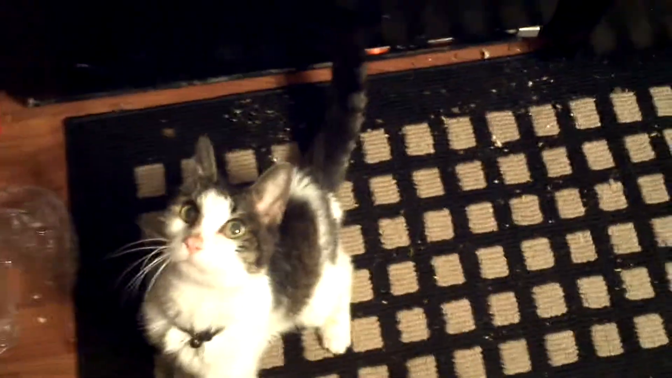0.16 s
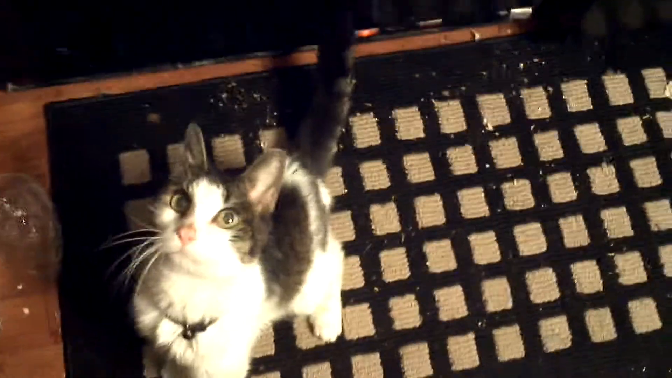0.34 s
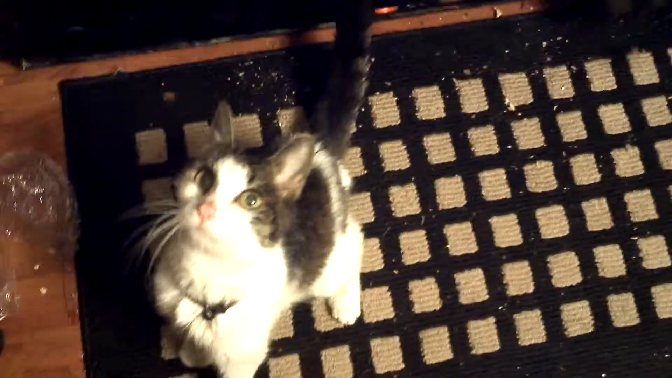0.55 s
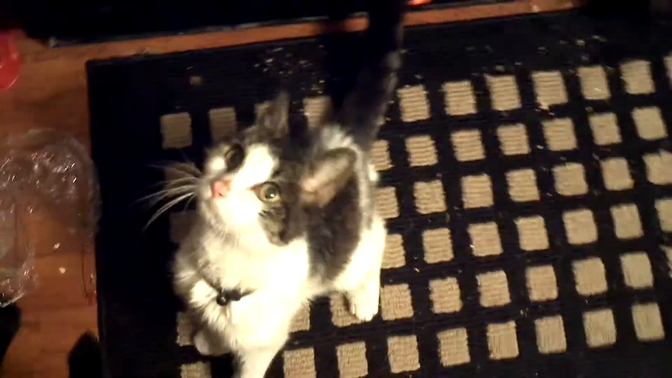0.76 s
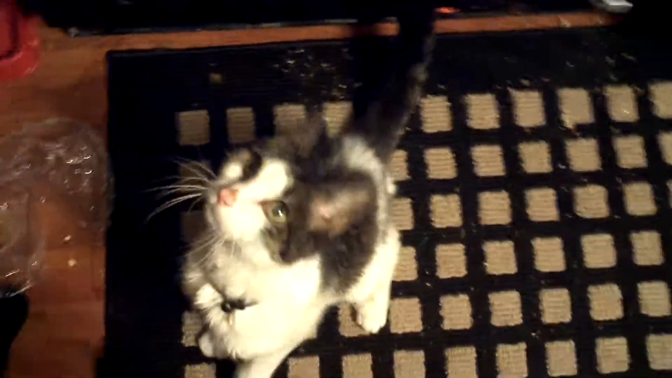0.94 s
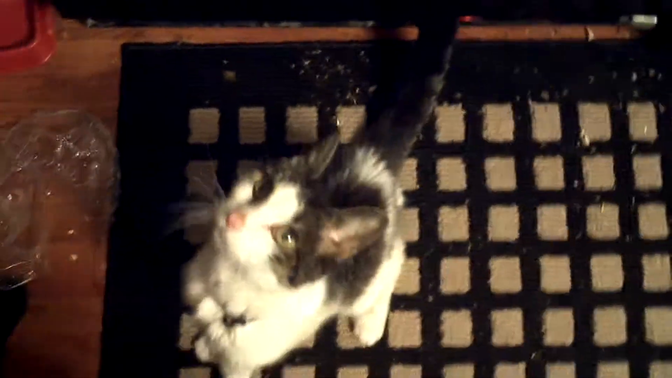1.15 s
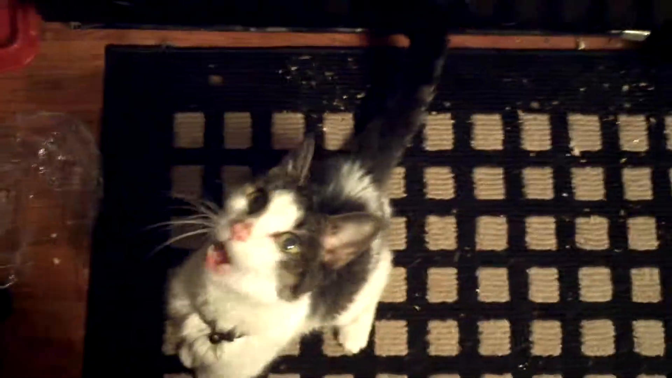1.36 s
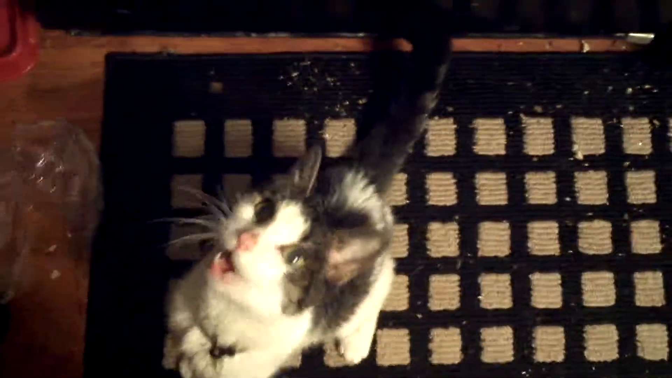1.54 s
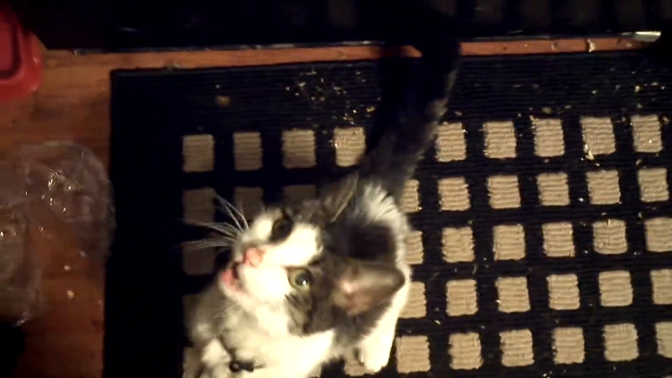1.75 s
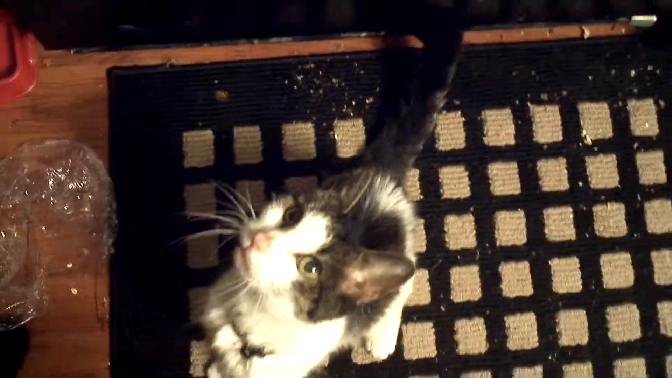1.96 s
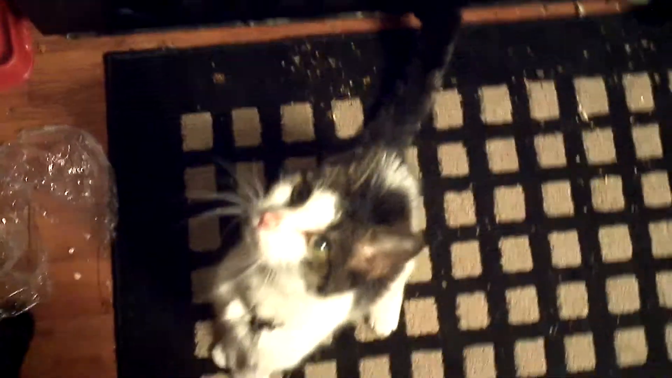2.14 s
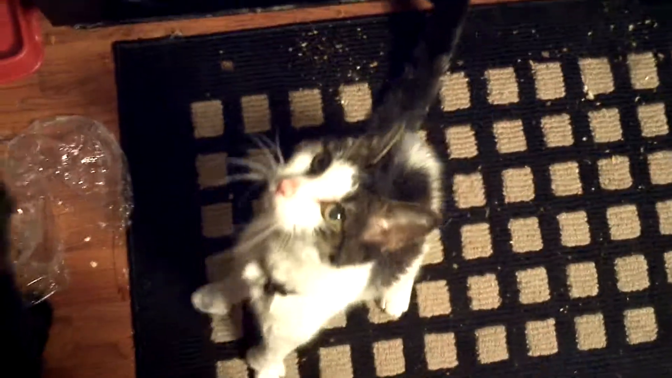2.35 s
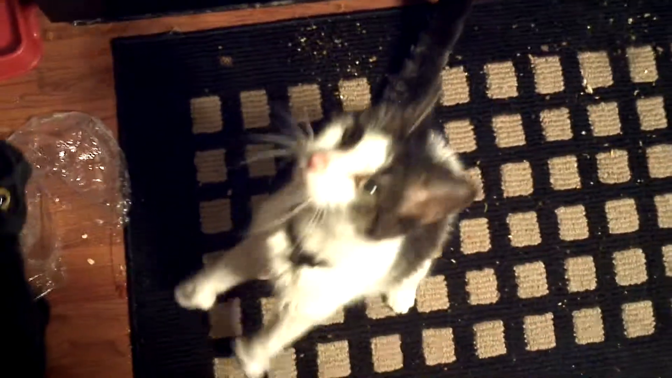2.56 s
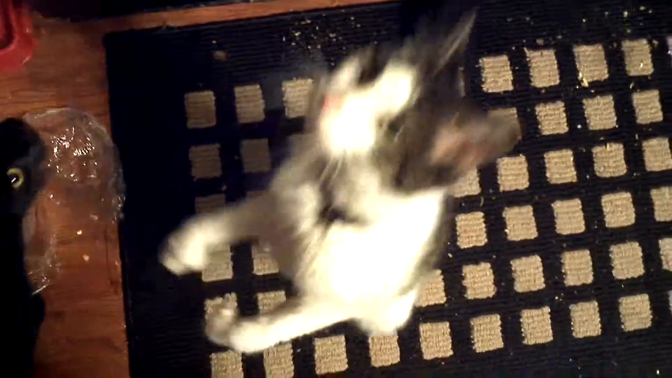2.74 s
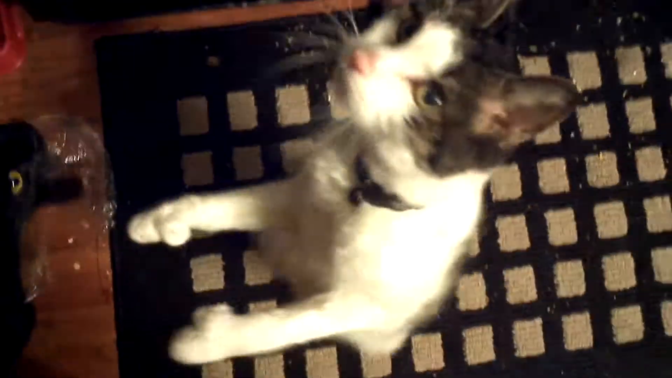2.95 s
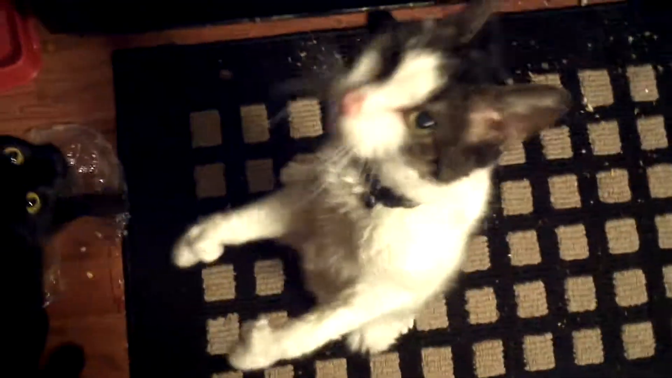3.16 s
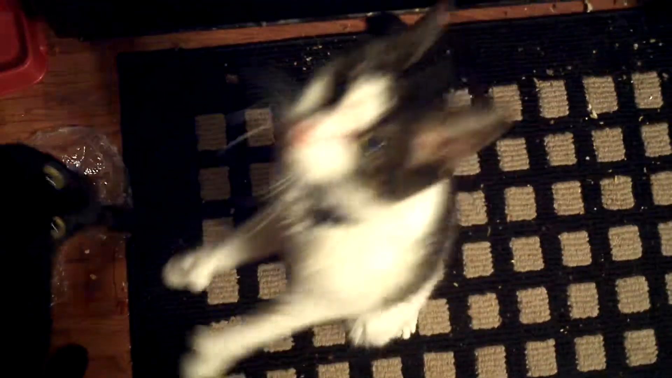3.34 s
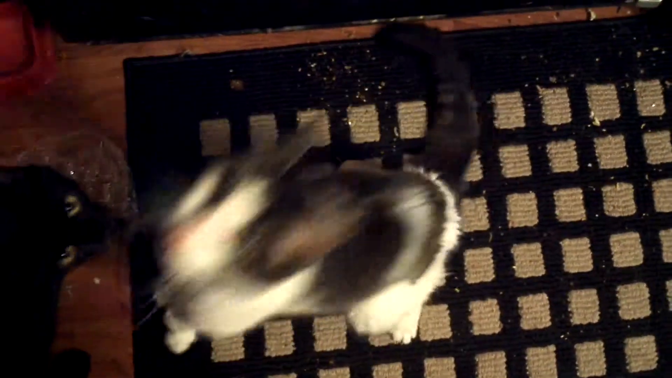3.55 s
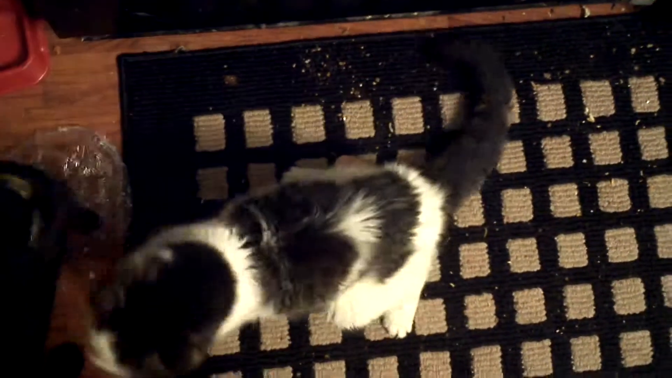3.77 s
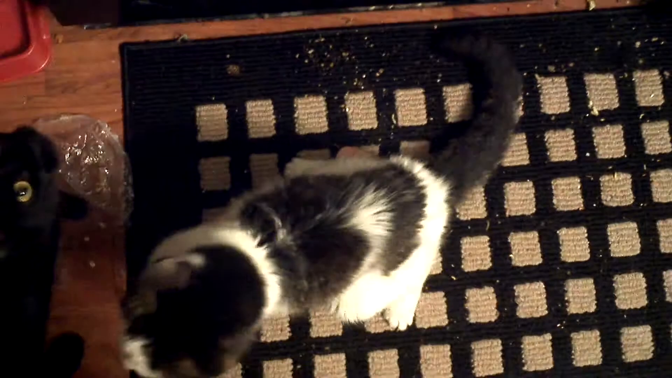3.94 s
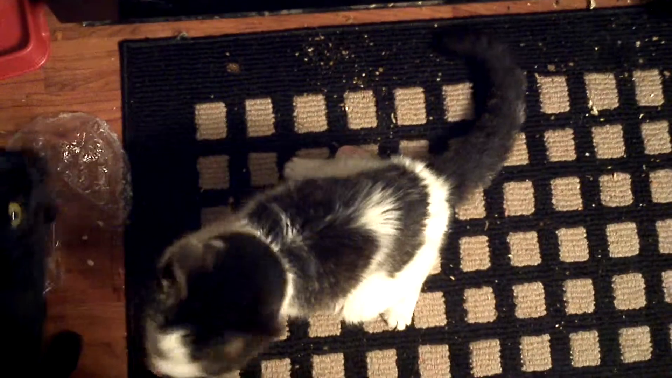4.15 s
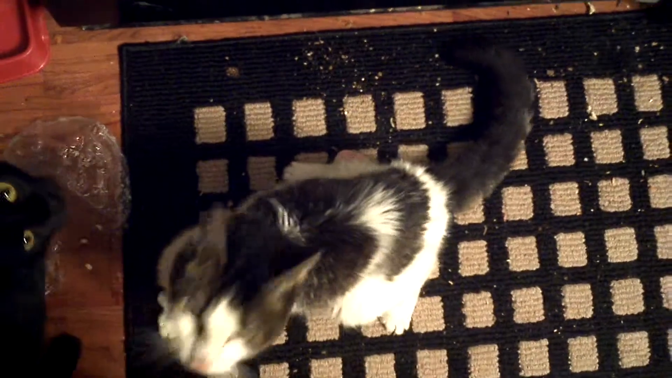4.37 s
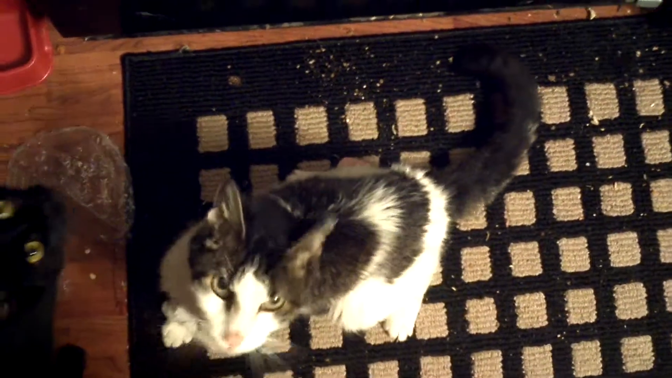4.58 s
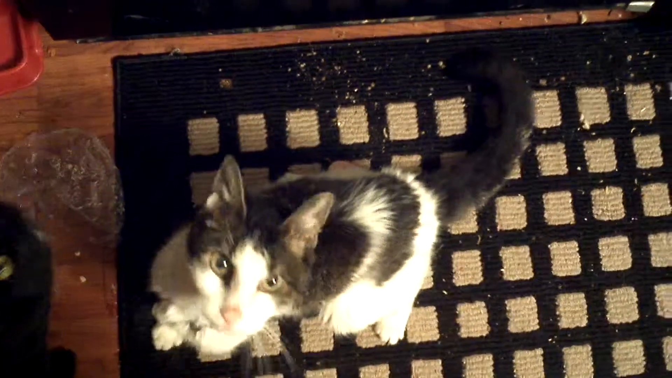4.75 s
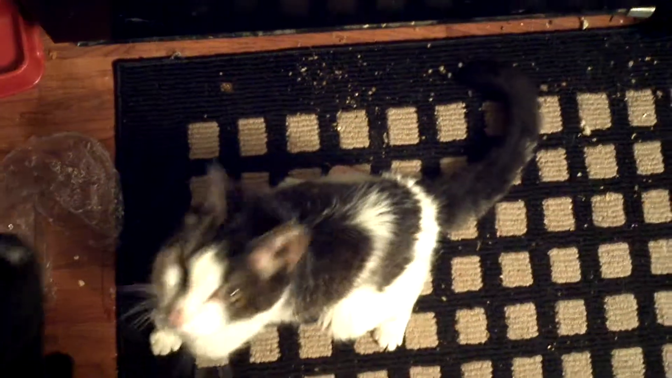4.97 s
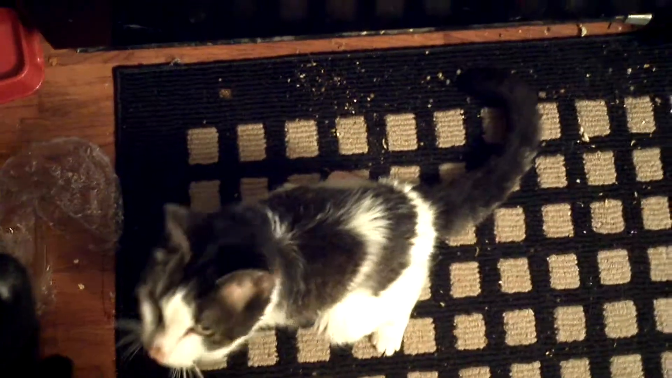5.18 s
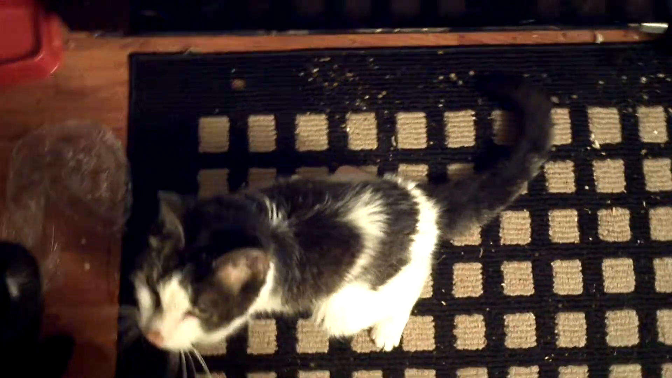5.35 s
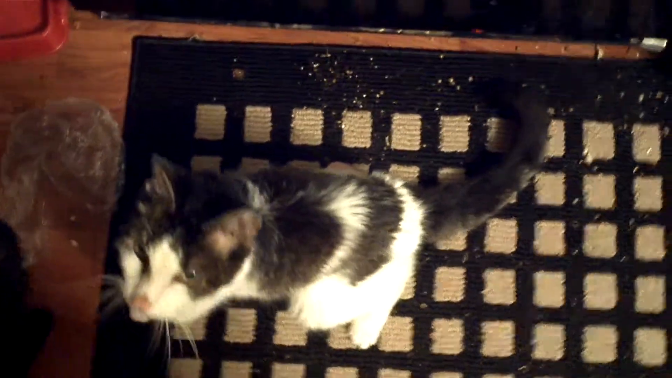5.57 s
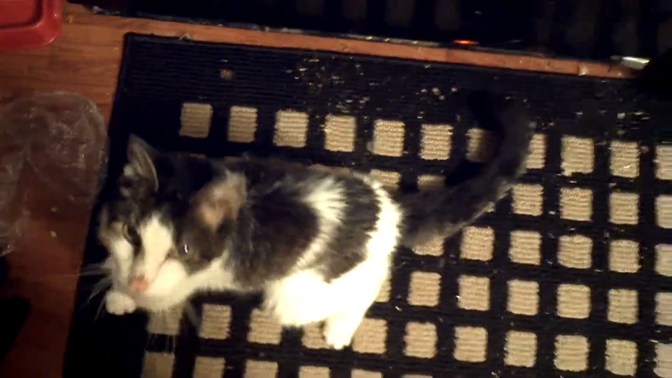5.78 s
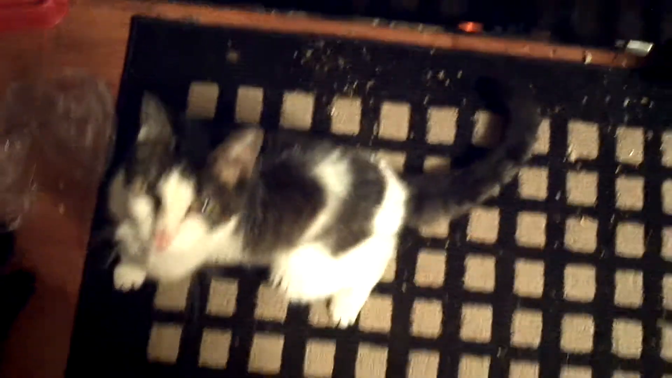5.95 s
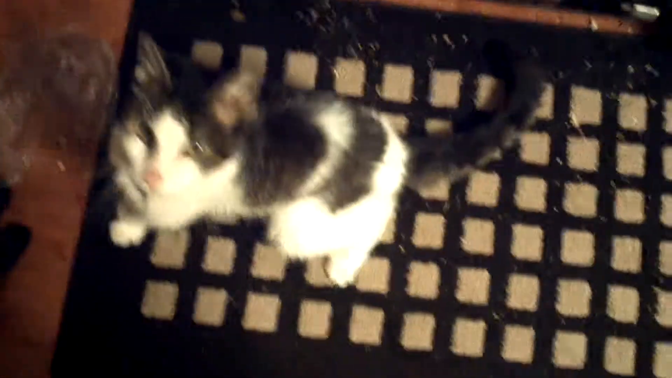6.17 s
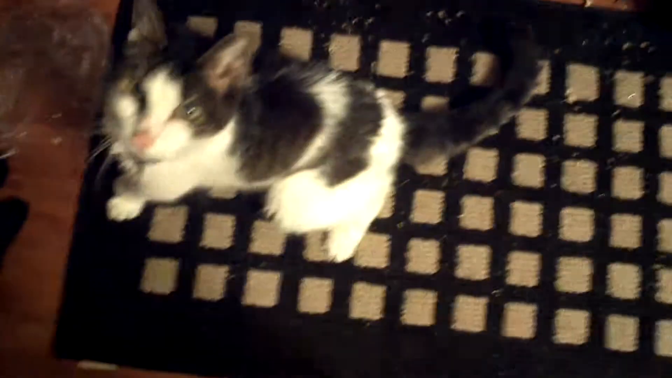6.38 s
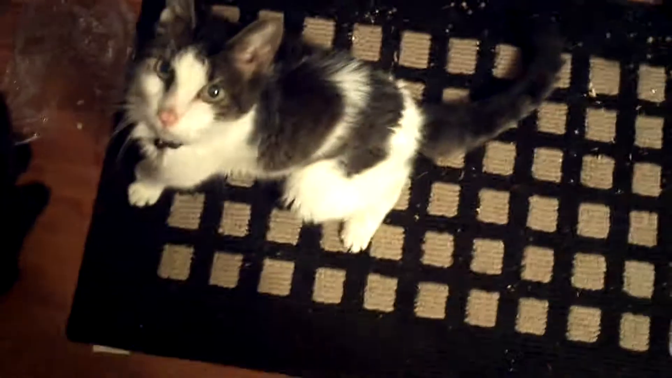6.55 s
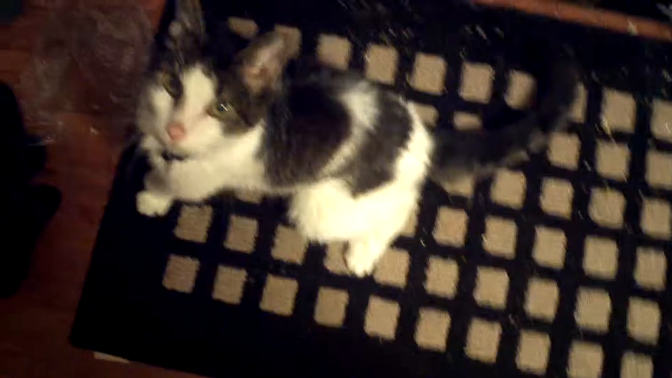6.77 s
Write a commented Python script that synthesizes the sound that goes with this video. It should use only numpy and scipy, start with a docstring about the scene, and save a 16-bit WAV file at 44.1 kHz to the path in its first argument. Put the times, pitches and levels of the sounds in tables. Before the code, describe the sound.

Indoors, a faint appliance hum runs under soft room noise and hiss. A young cat stirs on a floor mat, then meows once, close by, its pitch rising slightly and falling as the call turns raspy. A soft paw bump follows a second later. After a lull the cat shifts about with light scuffs, ticks and a few small hollow knocks, all picked up by a nearby hand-held microphone.

```python
"""An appliance hums throughout, over room noise, hiss and a thin whine that comes and goes.
A young cat stirs on a floor mat with small ticks and rustles. At 1.3 s it meows once, close by:
vocal-fold pulses ring its mouth and throat in a clear arch of pitch that breaks into a rasp at 1.7 s.
A soft paw bump comes at 3 s; from 5.5 s the cat shifts about, with scuffs, knocks and ticks.
A hand-held camera makes the stereo from two ports, each minus the delayed sound of the other."""
import sys
import numpy as np
from scipy import signal
from scipy.fft import rfft, irfft
from scipy.io import wavfile
from scipy.ndimage import uniform_filter1d

SR = 44100
rng = np.random.default_rng(int(sys.argv[2]) if len(sys.argv) > 2 else 0)


def generate_wav(sig):
    """Save sig (samples, or channels by samples) to the path in sys.argv[1] as 16-bit PCM at SR."""
    pcm = np.round(np.clip(np.atleast_2d(sig).T, -1, 1) * 32767).astype(np.int16)
    wavfile.write(sys.argv[1], SR, pcm)


N = 300497
TIME_S, BINS_HZ = np.arange(N) / SR, np.fft.rfftfreq(N, 1 / SR)
CONTACT_S = np.arange(4096) / SR  # time axis of one tick, thud or knock
PORT_LAG_S = 15 / SR


# vocal effort: t/s, level/dB
EFFORT = [(1.2, -70), (1.3, -46.5), (1.35, -38.5), (1.47, -36), (1.53, -32.5), (1.62, -30.5), (1.715, -33),
          (1.74, -34.5), (1.911, -36.5), (1.945, -46.5), (1.995, -69)]
# second resonance as the mouth opens fast and shuts slowly: t/s, f/Hz
MOUTH = [(1.22, 1110), (1.31, 1230), (1.335, 1560), (1.39, 1600), (1.45, 1570), (1.52, 1500), (1.58, 1500),
         (1.62, 1680), (1.67, 1510), (1.84, 1429), (1.95, 1150)]

def meow(body_db=-1.66, chest_db=-16.5, dip_db=-4):
    """Fold pulses and breath sound through mouth, chest and throat; the level drops in each pitch dip."""
    t = np.arange(EFFORT[0][0], EFFORT[-1][0], 1 / SR)
    cycles, pulses, puffs, roughness, dip = vocal_folds(t)
    mouth_hz = follow(MOUTH, t)
    body = mouth(pulses + .35 * roughness * puffs, mouth_hz)
    bright = throat(t, pulses + (.17 + .5 * roughness) * puffs, mouth_hz)
    body += gain(chest_db) * chest(cycles)
    voice = gain(follow(EFFORT, t) + body_db) * body + bright
    out = np.zeros(N)
    add(out, t[0], voice * gain(dip_db * dip) * signal.windows.tukey(len(t), .05))
    return near_reflection(out)


# pitch arch: t/s, f/Hz
PITCH = [(1.3, 276), (1.35, 287), (1.41, 291), (1.45, 288.5), (1.52, 294), (1.61, 297), (1.69, 291.5),
         (1.745, 290.5), (1.812, 285), (1.88, 270), (1.95, 245)]

def vocal_folds(t, clear_s=1.31, break_s=1.714, flutter_hz=29.5, wobble=.0028, jitter=.032):
    """The folds start hoarse, clear, then rasp: the pitch dips ever deeper and air gets through."""
    n = len(t)
    broken_s = np.maximum(t - break_s, 0)
    hoarse = .7 * np.exp(-np.maximum(t - clear_s, 0) / .055)
    rasp = .55 * (1 - np.exp(-broken_s / .05))
    roughness = .08 + hoarse + rasp
    flutter_rad = 2 * np.pi * flutter_hz * broken_s
    dip = np.sin((flutter_rad + .5 * (1 - np.cos(flutter_rad))) / 2) ** 4  # fast fall, slower recovery
    dip_depth = .035 + .62 * broken_s
    pitch_hz = follow(PITCH, t) * (1 - dip * dip_depth)
    pitch_hz *= 1 + wobble * drift(25, n) + jitter * roughness * drift(220, n)
    cycles = np.cumsum(pitch_hz) / SR
    pulses = unit_rms(sum(np.cos(2 * np.pi * k * cycles) for k in range(1, 52)))
    pulses *= np.exp(.4 * roughness * drift(200, n))
    airflow = .2 + np.exp(-(cycles % 1) / .2)
    puffs = unit_rms(airflow * rng.standard_normal(n))
    return cycles, pulses, puffs, roughness, dip


def mouth(drive, second_hz, first_open_hz=905):
    """Two strong resonances move with the opening; so small a mouth radiates almost no bass."""
    opening = second_hz / second_hz.max()
    first = resonate(drive, first_open_hz * np.sqrt(opening), width_hz=335)
    second = resonate(drive, second_hz, width_hz=350)
    return hold_level(bandpass(first - gain(.6) * second, [700, 2000], order=4))


# envelopes of the overtones near 2 kHz and of the treble: t/s, level/dB
OVERTONE_ENVELOPE = [(1.2, -72), (1.317, -60), (1.33, -46.5), (1.38, -42.5), (1.45, -41.5), (1.54, -43),
                     (1.64, -43), (1.74, -48.5), (1.88, -48), (1.98, -63)]
TREBLE_ENVELOPE = [(1.2, -78), (1.31, -63.5), (1.39, -47.5), (1.55, -45), (1.66, -49), (1.8, -53.5),
                   (1.93, -58), (1.98, -70)]
# throat resonances of the two bands: f/Hz, width/Hz, level/dB
OVERTONE_MODES = [(2214, 600, 11), (2480, 250, 7)]
TREBLE_MODES = [(3250, 390, 6.5), (4260, 750, -2.5), (4910, 720, -12), (6780, 600, 2.5), (7680, 880, -1),
                (11500, 3300, -31)]

def throat(t, drive, mouth_hz, wander=.018, closing_db=-20):
    """Upper resonances wander with tongue and jaw; a narrower mouth dulls the highest most."""
    dull_db_per_hz = closing_db * (1 - mouth_hz / mouth_hz.max()) / 2000
    shift = (mouth_hz / np.median(mouth_hz)) ** .053
    out = np.zeros(len(t))
    for envelope, modes in (OVERTONE_ENVELOPE, OVERTONE_MODES), (TREBLE_ENVELOPE, TREBLE_MODES):
        band = np.zeros(len(t))
        for hz, width_hz, db in modes:
            moving_hz = hz * shift * (1 + wander * drift(8.1, len(t)))
            band += gain(db + dull_db_per_hz * hz) * resonate_twice(drive, moving_hz, width_hz)
        out += gain(follow(envelope, t)) * hold_level(band)
    return out


def chest(cycles):
    """The two lowest harmonics leak unevenly through the chest."""
    harmonics = np.sin(2 * np.pi * cycles) + gain(-21) * np.sin(4 * np.pi * cycles)
    return harmonics * (1 + .35 * drift(45, len(cycles)))


def near_reflection(x, share=.23, mean_s=.0034, sway_s=.00011):
    """The path sways as head and camera move, so the overtones swell and dip in turn."""
    delay_s = mean_s + sway_s * drift(7)
    return x + share * np.interp(TIME_S - delay_s, TIME_S, x)


# sharp contacts: t/s, level/dB, f/Hz, decay/s, half width/octaves
TICKS = [(0.5432, -49, 9800, 0.0018, 0.36), (0.9368, -47.5, 2760, 0.0014, 0.38),
         (0.9381, -43, 8400, 0.00089, 0.16), (1.325, -46, 3000, .002, .9), (1.944, -47, 9000, .003, 0.73),
         (2.823, -51, 10100, .0016, 0.14), (5.8783, -42, 6000, 0.0013, 0.86),
         (6.0641, -44.5, 9500, 0.0022, 0.69), (6.1035, -42.5, 7140, 0.004, 0.053),
         (6.1035, -42, 10600, .0025, .4), (6.126, -46, 9000, 0.0016, 0.47),
         (6.132, -47, 7260, 0.0024, 0.076), (6.155, -51, 7400, .0016, .25),
         (6.2955, -38, 7360, 0.0007, 0.39), (6.3215, -42.5, 7500, .001, 0.18),
         (6.3425, -46, 6300, 0.00092, 0.84), (6.7398, -44, 7700, 0.0014, 0.11)]

def ticks(trim_db=1.5):
    """Each contact is a band of noise that dies in a few milliseconds."""
    out = np.zeros(N)
    for start_s, db, hz, decay_s, octaves in TICKS:
        edges_hz = np.clip([hz / 2 ** octaves, hz * 2 ** octaves], 20, .45 * SR)
        grit = rng.standard_normal(len(CONTACT_S)) * np.exp(-CONTACT_S / decay_s)
        burst = bandpass(grit, edges_hz, order=2)
        add(out, start_s, gain(db + trim_db) * burst / abs(burst).max())
    return out


# paw falls: t/s, level/dB, f/Hz, rise/s
PAW_THUDS = [(1.438, -39.5, 334, 0.002), (1.935, -40, 240, 0.004), (2.9774, -33, 275, 0.0022),
             (5.873, -39.5, 440, 0.0023)]

def paw_thuds():
    """Soft paws on the padded floor: a few low cycles that swell and die."""
    out = np.zeros(N)
    for start_s, db, hz, rise_s in PAW_THUDS:
        age = CONTACT_S / rise_s
        add(out, start_s, gain(db) * age * np.exp(1 - age) * np.sin(2 * np.pi * hz * CONTACT_S))
    return out


# strikes: t/s, level/dB
KNOCKS = [(2.9765, -58), (2.984, -62), (5.873, -56), (6.2052, -47.5), (6.2116, -47), (6.476, -58)]
# modes of the struck object: f/Hz, level/dB, t60/s
HOLLOW_MODES = [(1022, -1, 0.037), (1230, 0, 0.025), (1730, 0, 0.031), (1850, -3, .035), (2170, -2, 0.018)]

def knocks(rise_s=.00062):
    """Light knocks ring something small and hollow."""
    out = np.zeros(N)
    attack = np.minimum(CONTACT_S / rise_s, 1)
    for start_s, db in KNOCKS:
        for hz, mode_db, t60_s in HOLLOW_MODES:
            envelope = attack * gain(db + mode_db - 60 * CONTACT_S / t60_s)
            add(out, start_s, envelope * np.sin(2 * np.pi * (hz * CONTACT_S + rng.random())))
    return out


# brush strokes: t/s, length/s, scuff level/dB, rustle level/dB
STROKES = [(0.84, 0.63, -55, -71), (1.836, 0.2, -56, -68), (5.493, 0.19, -60, -72.5),
           (5.867, 0.08, -54.5, -61.5), (6.063, 0.22, -70, -62), (6.121, 0.038, -70, -60),
           (6.327, 0.044, -63, -58.5), (6.35, 0.59, -66, -70)]
# spectral shapes: f/Hz, level/dB
SCUFF_SPECTRUM = [(90, -8), (250, -4), (430, 3), (700, -2.5), (1100, -15.5), (3000, -23), (6000, -34)]
RUSTLE_SPECTRUM = [(500, -18), (2000, 6), (3500, -3), (5500, -11), (7300, 7), (9000, 11), (11500, -0.5),
                   (15000, 0.5)]

def mat_brushing(rise_share=.25, grain_db=3, scuff_trim_db=-1, rustle_trim_db=2):
    """Fur and paws brush the mat: each stroke swells and fades as a dull scuff and a grainy rustle."""
    scuff, rustle = np.zeros((2, N))
    for start_s, length_s, scuff_db, rustle_db in STROKES:
        stroke = np.interp((TIME_S - start_s) / length_s, [0, rise_share, 1], [0, 1, 0])
        scuff += gain(scuff_db + scuff_trim_db) * stroke
        rustle += gain(rustle_db + rustle_trim_db) * stroke
    return scuff * noise(SCUFF_SPECTRUM) + rustle * gain(grain_db * drift(150)) * noise(RUSTLE_SPECTRUM)


# room decay: f/Hz, t60/s
ROOM_DECAY = [(200, 0.64), (1000, 0.21), (4000, 0.53), (12000, 0.012)]

def reverb(x, first_s=.0017, echoes_per_s=3000):
    """Sparse reflections of random sign, each band dying at its own rate."""
    n = SR // 2
    echoes = rng.standard_normal((2, n)) * (rng.random((2, n)) < echoes_per_s / SR)
    echoes *= TIME_S[:n] > first_s
    hz, t, spectra = signal.stft(echoes, SR, nperseg=256)
    decay = gain(-60 * t / at_hz(ROOM_DECAY, hz)[:, None])
    tail = signal.istft(spectra * decay, SR, nperseg=256)[1]
    tail /= np.linalg.norm(tail[0])
    return diffuse(signal.fftconvolve(x[None], tail, axes=1)[:, :N])


# appliance tones: f/Hz, level/dB
HUM_TONES = [(118.4, -77), (177.6, -64), (236.9, -72), (312.2, -65.5), (532.9, -66), (759.0, -72.5),
             (925.9, -75)]

def appliance_hum(trim_db=-1, waver_rad=.92, swell_db=3):
    """Tones waver in strength and phase, the higher ones more in phase."""
    out = np.zeros((2, N))
    for hz, db in HUM_TONES:
        phase_rad = 2 * np.pi * hz * TIME_S + waver_rad * np.sqrt(hz / 300) * drift(10.8)
        tone = np.sqrt(2) * gain(db + trim_db + swell_db * drift(27)) * np.sin(phase_rad)
        port_gain = 2 * np.sin(np.pi * hz * PORT_LAG_S)  # port subtraction thins the bass
        out += from_left(tone, lag_s=.00003) / port_gain
    return out


# whine swells: t/s, half length/s
WHINE_SWELLS = [(.12, .15), (1.15, .08), (2.4, .06), (2.96, .11), (3.56, .07), (5.2, .11), (5.7, .1)]

def whine(hz=3950, width_hz=220, floor_db=-88, swell_db=10):
    """A thin, high band of noise comes and goes."""
    band = unit_rms(resonate_twice(rng.standard_normal(N), hz, width_hz))
    swell = sum(np.exp(-((TIME_S - peak_s) / half_s) ** 2) for peak_s, half_s in WHINE_SWELLS)
    return from_left(gain(floor_db + swell_db * swell) * band)


# spectral shapes: f/Hz, level/dB
ROOM_SPECTRUM = [(25, -2), (55, -20), (85, -4), (130, -1), (200, 3), (270, -1), (370, 9), (470, -7.5),
                 (650, -10), (900, -12.5), (1400, -23), (2200, -20), (3000, -30), (6000, -33.5)]
HISS_SPECTRUM = [(1000, 8), (3300, -7.5), (4400, -1.5), (4950, 6.5), (5500, -11), (7000, -2.5), (9000, 1.5),
                 (11000, -0.5), (15500, -0.5)]

def noise_floor(room_db=-55.5, flicker_db=.47, hiss_db=-68):
    """Faintly flickering room noise and steady microphone hiss."""
    room = noise(ROOM_SPECTRUM) * gain(room_db + flicker_db * drift(18))
    return room + gain(hiss_db) * noise(HISS_SPECTRUM)


# shading at the far port: f/Hz, level/dB
FAR_PORT_SHADE = [(300, -2), (900, -4), (1300, -6), (2000, -13), (3500, -15), (8000, -15)]

def from_left(x, lag_s=.00021):
    """Sound from the left reaches the far port later and shaded."""
    far = rfft(x) * delay(lag_s) * gain(at_hz(FAR_PORT_SHADE, BINS_HZ))
    return np.array([x, irfft(far, N)])


def diffuse(pair):
    """Two unrelated signals become sound from all sides, alike at both ports in the bass only."""
    a, b = rfft(pair)
    coherence = .985 * np.sinc(2 * BINS_HZ * PORT_LAG_S)
    mid = np.sqrt((1 + coherence) / 2) * a
    side = np.sqrt((1 - coherence) / 2) * b
    return irfft([mid + side, mid - side], N)


def noise(spectrum):
    """Diffuse coloured noise, rms 1."""
    white = rfft(rng.standard_normal((2, N)))
    return unit_rms(diffuse(irfft(white * gain(at_hz(spectrum, BINS_HZ)), N)))


def drift(hz, n=N):
    """First n samples of a random curve of rms 1, band-limited to about hz."""
    spectrum = rfft(rng.standard_normal(N)) * np.exp(-(BINS_HZ / hz) ** 2)
    return unit_rms(irfft(spectrum, N))[:n]


def resonate(x, hz, width_hz):
    """Unity-gain resonance; hz may be a curve."""
    carrier = np.exp(2j * np.pi * np.cumsum(hz * np.ones(len(x))) / SR)
    pole = np.exp(-np.pi * width_hz / SR)
    return 2 * (carrier * signal.lfilter([1 - pole], [1, -pole], x / carrier + 1e-18)).real


def resonate_twice(x, hz, width_hz):
    return resonate(resonate(x, hz, width_hz), hz, width_hz)


def bandpass(x, edges_hz, order):
    return signal.sosfilt(signal.butter(order, edges_hz, "band", fs=SR, output="sos"), x)


def hold_level(x):
    """Holds the short-time rms at 1."""
    power = uniform_filter1d(uniform_filter1d(x ** 2, size=1000), size=1000)
    return x / np.sqrt(abs(power) + 1e-12)


def unit_rms(x):
    return x / np.sqrt(np.mean(x ** 2) + 1e-20)


def gain(db):
    return 10 ** (np.asarray(db) / 20)


def at_hz(rows, hz):
    """Interpolates over log frequency."""
    knots_hz, values = np.transpose(rows)
    return np.interp(np.log(hz + 1), np.log(knots_hz + 1), values)


def follow(rows, t):
    """Interpolates over time."""
    return np.interp(t, *np.transpose(rows))


def delay(lag_s):
    """Spectrum of a delay."""
    return np.exp(-2j * np.pi * BINS_HZ * lag_s)


def add(mix, start_s, sound):
    part = mix[round(start_s * SR):][:len(sound)]
    part += sound[:len(part)]


def scene():
    """The sound at the two ports."""
    near = meow() + ticks() + paw_thuds() + knocks()
    reflections = reverb(gain(-14.5) * near)
    background = noise_floor()
    return from_left(near) + reflections + mat_brushing() + appliance_hum() + whine() + background


def record(dry):
    """Each port minus the delayed other port aims its channel to one side; a low-pass follows."""
    ports = rfft(dry)
    aimed = irfft(ports - delay(PORT_LAG_S) * ports[::-1], N)
    balance_db, cutoff_hz = [[.2], [-.2]], 15800
    lowpass = signal.firwin(511, cutoff_hz, window=("kaiser", 9), fs=SR)
    return signal.oaconvolve(aimed * gain(balance_db), lowpass[None], "same")


dry = scene()
out = record(dry)
generate_wav(out)
```